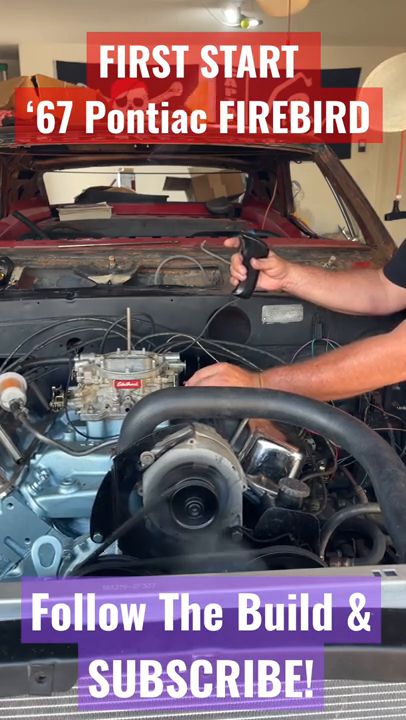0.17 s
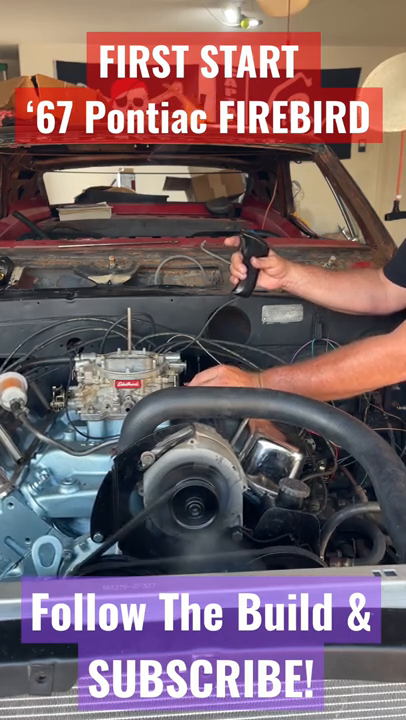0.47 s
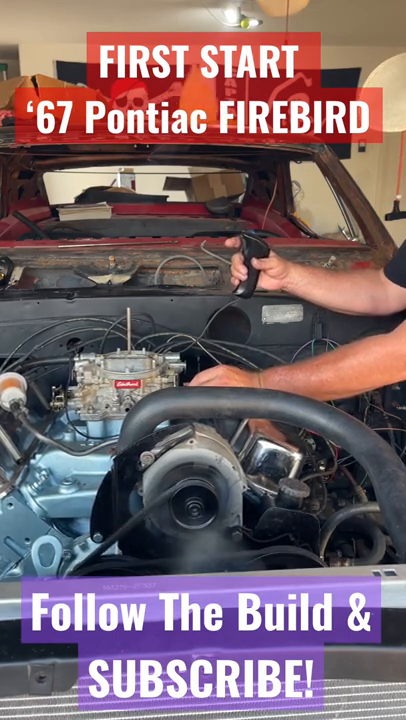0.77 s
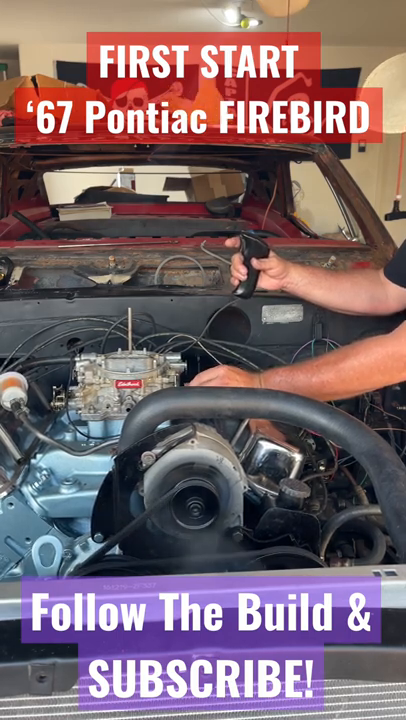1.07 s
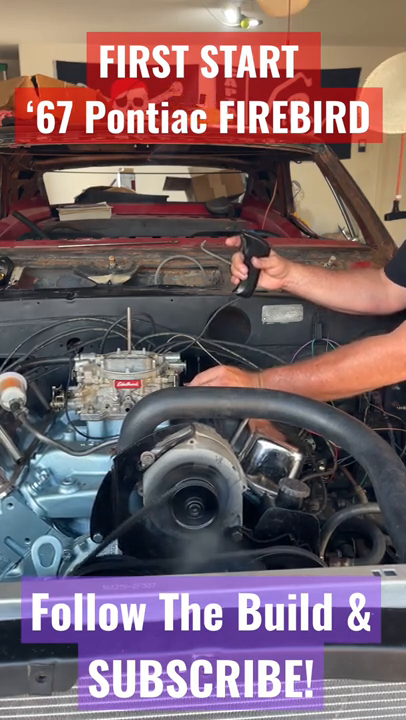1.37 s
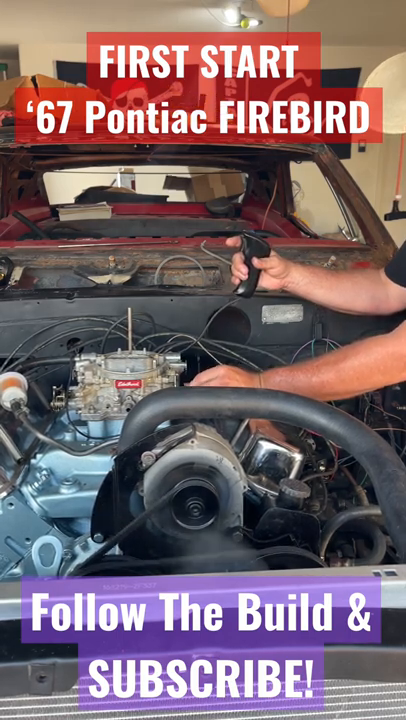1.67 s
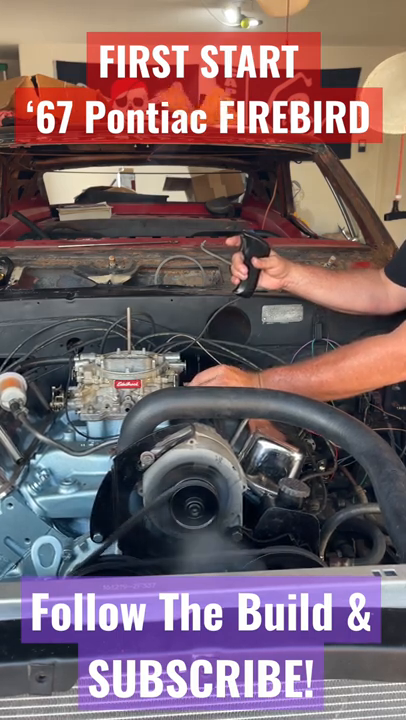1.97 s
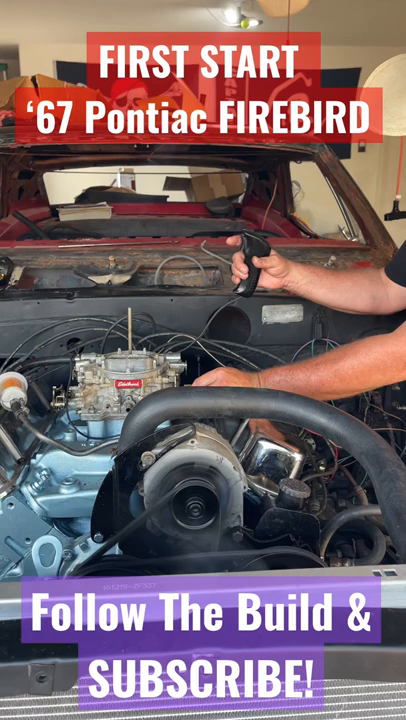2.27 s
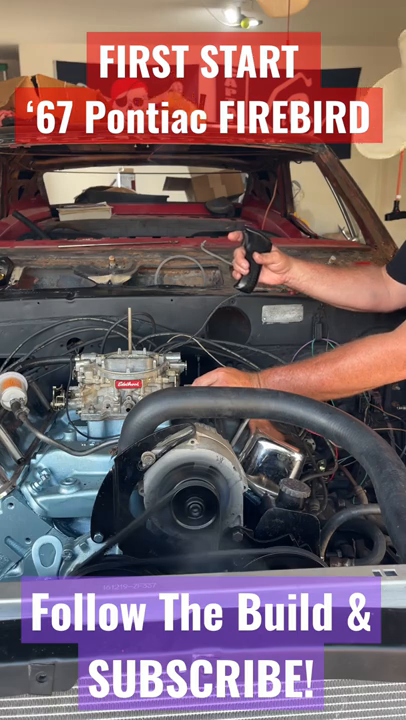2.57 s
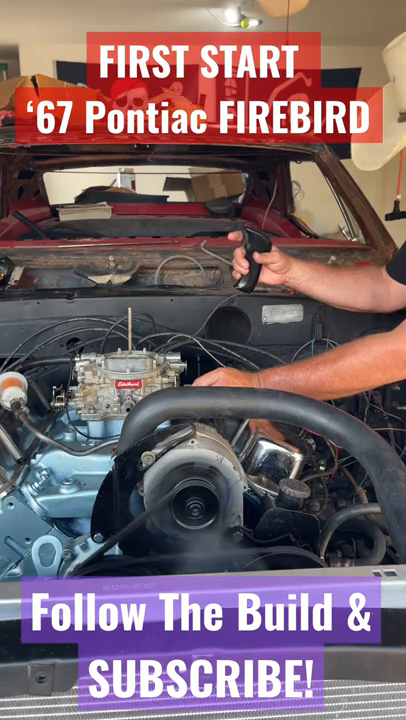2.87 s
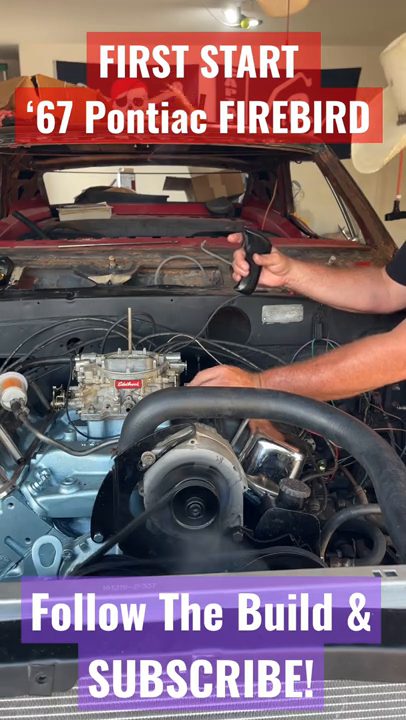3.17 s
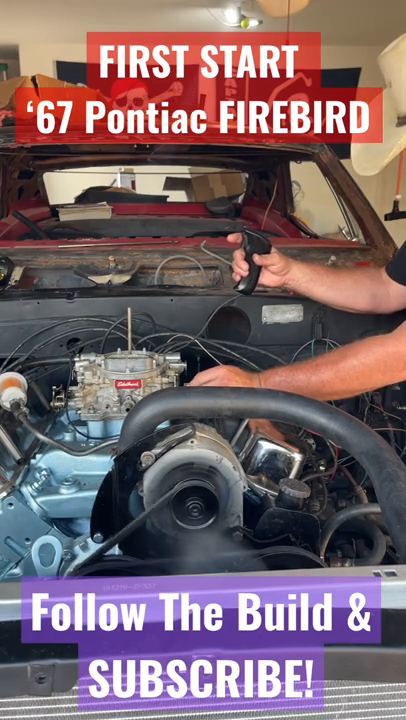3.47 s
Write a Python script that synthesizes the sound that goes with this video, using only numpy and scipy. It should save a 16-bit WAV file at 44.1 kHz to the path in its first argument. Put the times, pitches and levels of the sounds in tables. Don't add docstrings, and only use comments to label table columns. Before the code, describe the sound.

An old eight-cylinder car engine is already running loud and rough, blipped at about 0.3, 0.7, 1.3 and 1.9 seconds, with ringing pipes, air hiss and scattered pops, the strongest near 1.2. From about 2.1 it coasts down, quieter and deeper, over steady fan and belt hiss. Around 3.45-3.6 it stumbles with clustered pops, spitting air and faint belt wheeze. Close phone pickup, hard garage echoes.

```python
import sys
import numpy as np
from scipy import signal
from scipy.fft import rfft, irfft, next_fast_len
from scipy.io import wavfile
from scipy.ndimage import uniform_filter1d

SR = 44100
rng = np.random.default_rng(int(sys.argv[2]) if len(sys.argv) > 2 else 0)


def persist_wave(psi):
    counts = np.round(np.clip(psi, -1, 1) * 32767).astype(np.int16)
    wavfile.write(sys.argv[1], SR, np.atleast_2d(counts).T)


def attenuation_scalar(level_db):
    decades = np.asarray(level_db, float) / 20
    return 10 ** decades


N = 159642
T = np.arange(N) / SR


def evened(x):
    return x / np.sqrt(np.mean(x ** 2) + 1e-20)


def read(points, hz):
    f, value = np.transpose(points)
    return np.interp(np.log(hz + 1), np.log(f + 1), value)


def curve(table, index=1):
    columns = np.transpose(table)
    return np.interp(T, columns[0], columns[index])


def colour(x, points):
    log_gain = np.log(attenuation_scalar(read(points, abs(np.fft.fftfreq(8192, 1 / SR)))))
    taps = np.fft.ifft(np.exp(np.conj(signal.hilbert(log_gain)))).real[:4096]
    return signal.oaconvolve(x, taps)[:len(x)]


def resonate(x, hz, width):
    r = np.exp(-np.pi * width / SR)
    return signal.lfilter([1 - r, 0, r - 1], [1, -2 * r * np.cos(2 * np.pi * hz / SR), r * r], x)


def ringing(x, modes):
    return evened(sum(attenuation_scalar(db) * evened(resonate(x, f, w)) for f, w, db in modes))


def drift(size):
    return evened(uniform_filter1d(uniform_filter1d(rng.standard_normal(N), size), size))


def without(x, gaps):
    size = next_fast_len(N)
    hz = np.fft.rfftfreq(size, 1 / SR)
    keep = np.prod([(hz < lo) | (hz > hi) for lo, hi in gaps], axis=0)
    return irfft(rfft(x, size) * keep, size)[:N]


# t/s, firing rate f/Hz
FIRING_RATE = [(0, 126.4), (.2, 148.9), (.3, 165.3), (.4, 180.5), (.52, 183.2), (.64, 176.5), (.8, 189.3),
               (.92, 184.3), (1.2, 159.5), (1.37, 168.6), (1.5, 166.2), (1.76, 148.6), (1.88, 154.2),
               (2.01, 175.8), (2.12, 173.7), (2.6, 127), (3.0, 96.15), (3.42, 67.45)]


def firing_rate():
    return curve(FIRING_RATE)


# t/s, level/dB
THROTTLE_OPENING = [(0, -23.5), (.17, -26.5), (.31, -19.5), (.45, -24.5), (.6, -28.5), (.69, -21.5),
                    (.77, -24), (.84, -27.5), (1.2, -31.5), (1.3, -25.5), (1.42, -26.5), (1.47, -31.5),
                    (1.74, -32), (1.9, -22.5), (2.04, -27.5), (2.11, -30), (2.9, -39.5), (3.43, -42.5)]


def throttle():
    load_db = curve(THROTTLE_OPENING)
    return load_db, load_db - load_db.max()


# t/s, even firing level/dB, strong-weak lope level/dB, unevenness [0-1]
RUNNING = [(0, -14, -52, 0.37), (.24, -11, -46, 0), (.31, -20.5, -30, 0.82), (.47, -9, -23, 0.41),
           (.54, -18, -14, 0.82), (.68, -20, -30, 0.98), (.79, -17, -24.5, 1), (.91, -23.5, -19, 0.83),
           (1.2, -25, -21.5, 0.87), (1.36, -17, -29, 0.91), (1.46, -30.5, -19.5, 0.69),
           (1.7, -19.5, -23.5, 0.65), (1.88, -13, -33.5, 0.38), (2.07, -19, -22, 1),
           (2.2, -22.5, -22.5, 0.42), (2.48, -19, -27.5, 0.54), (3.12, -26, -32.5, 0.61),
           (3.5, -35.5, -49, .9)]
CYLINDER_STRENGTH = [-1, 1, -1, 4.5, 0, -4.5, -12, 2]


def firings(turns):
    fire = np.arange(1, int(turns[-1]))
    luck = np.clip(rng.standard_normal((len(fire), 3)), -1.7, 1.7)
    uneven = np.interp(fire, turns, np.clip(curve(RUNNING, index=3), 0, 1.5))
    late = 0.1 * uneven * luck[:, 0]
    at = np.interp(fire + late, turns, np.arange(N)).astype(int)
    size_db = np.array(CYLINDER_STRENGTH)[fire % 8] + 3 * luck[:, 1]
    return fire, at, attenuation_scalar(uneven * size_db), luck


# f/Hz, level/dB
EXHAUST_COLOUR = [(30, -30), (55, -1), (75, 7), (140, 2.5), (187, -0.5), (225, -6.5), (330, -3),
                  (1500, -30)]


def exhaust(turns, fire, at, size):
    angle = np.interp(np.arange(N), np.r_[0, at, N], np.r_[0, fire, turns[-1]])
    narrow = 1.63
    hump = np.exp(narrow * (np.cos(2 * np.pi * angle) - 1))
    nearest = np.clip(np.round(angle).astype(int) - 1, 0, len(fire) - 1)
    pulses = attenuation_scalar(curve(RUNNING) + 9.5) * (size[nearest] * hump - hump.mean())
    return colour(pulses, EXHAUST_COLOUR)


# f/Hz, level/dB
LOPE_COLOUR = [(30, -34.5), (55, 0), (85, 3), (150, -5.5), (260, -1), (400, -12), (900, -26), (2500, -53)]


def lope(fire, at, size):
    push = size * SR / (np.sqrt(2) * firing_rate()[at])
    kicks = np.zeros(N)
    kicks[at] = push * attenuation_scalar(curve(RUNNING, index=2)[at]) * (-1.) ** fire
    return colour(kicks, LOPE_COLOUR)


def gas_puffs(turns, size, puff_gain):
    which = np.clip(turns.astype(int) - 1, 0, len(size) - 1)
    fade = np.exp(-(turns % 1) / 0.5)
    gate = 0.8 + puff_gain[which] * np.sqrt(size[which]) * fade
    return gate * rng.standard_normal(N)


# f/Hz, level/dB
ROAR_COLOUR = [(40, -48), (90, -6.5), (190, -2.5), (700, -6), (1500, -18), (2500, -19), (4500, -25),
               (9000, -61)]


def roar(puffs):
    load_db, _ = throttle()
    return attenuation_scalar(load_db + 5) * evened(colour(puffs, ROAR_COLOUR))


# f/Hz, width/Hz, level/dB
PIPE_MODES = [(264, 150, -7), (409, 15, 7.5), (567, 13, -3), (728, 21, -12), (982, 170, 6.5),
              (2300, 200, -63.5)]


def pipes(at, size, puff_gain, puffs):
    _, below_full = throttle()
    clicks = np.zeros(N)
    clicks[at] = np.sqrt(size) * puff_gain
    drive = evened(clicks) + evened(puffs)
    return attenuation_scalar(-25 + 0.78 * below_full) * ringing(drive, PIPE_MODES)


# multiple of firing rate, level/dB
LOAD_TONES = [(1.625, -22.5), (2.0, -27), (2.25, -25)]


def load_tones(turns):
    _, below_full = throttle()
    tones = np.zeros(N)
    for multiple, db in LOAD_TONES:
        level = attenuation_scalar(db + 2.5 * drift(size=1500))
        tones += level * np.sqrt(2) * np.sin(2 * np.pi * multiple * turns)
    return attenuation_scalar(1.66 * below_full) * tones


# f/Hz, width/Hz, level/dB
BOOM_MODES = [(102, 26, 0), (137.3, 17, 0.5), (399, 24, -10.5)]


def boom():
    _, below_full = throttle()
    rough = np.clip(curve(RUNNING, index=3), 0, 1.5)
    stir = rng.standard_normal(N)
    air = evened(sum(attenuation_scalar(db) * evened(resonate(resonate(stir, f, w), f, w)) for f, w, db in BOOM_MODES))
    return rough ** 2 * attenuation_scalar(-19 + 0.14 * below_full) * air


def engine():
    turns = np.cumsum(firing_rate()) / SR
    fire, at, size, luck = firings(turns)
    puff_gain = attenuation_scalar(2.4 * luck[:, 2])
    puffs = gas_puffs(turns, size, puff_gain)
    thump = exhaust(turns, fire, at, size) + lope(fire, at, size)
    rough_air = roar(puffs) + boom()
    return thump + rough_air + pipes(at, size, puff_gain, puffs) + load_tones(turns)


# f/Hz, level/dB
POP_COLOUR = [(80, -17), (300, 6), (900, -6.5), (2000, -11.5), (4000, -8.5), (8000, -22.5)]
# f/Hz, level/dB
HISS_COLOUR = [(1500, -37.5), (4000, -7), (6000, -5), (9000, -5), (11000, -1), (12500, -10.5), (14000, -27),
               (15500, -20)]
# t/s, level/dB, ring f/Hz, puff length/s, hiss level/dB
STRAY_BURNS = [(.296, -23, 910, 0.016, -34), (.564, -15, 1090, 0.0082, -38), (.682, -16.5, 2300, .01, -40),
               (.828, -23, 2270, 0.0066, -47), (1.16, -10.5, 600, 0.0094, -34),
               (2.03, -17.5, 2200, .006, -42), (2.402, -21.5, 800, .015, -43),
               (3.453, -22.5, 401.5, 0.029, -31), (3.456, -28, 1654, 0.0081, -50),
               (3.457, -33, 690, 0.0058, -50), (3.484, -30, 2090, 0.017, -42), (3.606, -23, 750, .01, -50),
               (3.546, -22, 1550, 0.031, -23), (3.579, -22, 650, 0.039, -28.5),
               (3.604, -19.5, 3060, 0.0083, -30), (3.605, -24, 2100, 0.018, -37)]


def pops():
    out = np.zeros(N + 8192)
    t = np.arange(8192) / SR
    for s, db, hz, puff_s, hiss_db in STRAY_BURNS:
        rise = np.minimum(t / 0.0025, 1)
        puff = rng.standard_normal(8192) * rise * np.exp(-t / puff_s)
        strength = np.sqrt(np.mean(puff ** 2))
        ring_share = min(0.0082 / puff_s, 0.9)
        ring = evened(resonate(puff, hz, width=140))
        thud = evened(colour(puff, POP_COLOUR))
        body = ring_share * ring + (1 - ring_share) * thud
        spit = attenuation_scalar(hiss_db) * evened(colour(puff, HISS_COLOUR))
        out[round(s * SR):][:8192] += strength * (attenuation_scalar(db) * body + spit)
    return out[:N]


def intake():
    _, below_full = throttle()
    carburettor, fan = attenuation_scalar(-22 + 1.086 * below_full), attenuation_scalar(-38)
    air = evened(colour(rng.standard_normal(N), HISS_COLOUR))
    flutter = attenuation_scalar(0.83 * (drift(size=200) + drift(size=900)))
    return np.hypot(carburettor, fan) * flutter * air


# f/Hz, level/dB
HIGH_HISS_COLOUR = [(6000, -41), (9500, 5), (12000, 4), (14000, -13.5), (16000, -4)]


def late_high_hiss():
    stall = np.clip((97 - firing_rate()) / 18.9, 0, 1)
    return attenuation_scalar(-36.5) * stall * evened(colour(rng.standard_normal(N), HIGH_HISS_COLOUR))


def garage(x):
    taps = np.zeros((2, 22000))
    at = np.arange(200, 21900, 20) + rng.integers(0, 20, (2, 1085))
    np.put_along_axis(taps, at, rng.choice([-1., 1.], at.shape), 1)
    taps *= attenuation_scalar(-60 * np.arange(22000) / SR / 0.59)
    taps /= np.linalg.norm(taps[0])
    taps = signal.lfilter(*signal.butter(2, 302, "high", fs=SR), taps)
    return signal.fftconvolve(x[None], taps, axes=1)[:, :N]


# f/Hz, likeness [0-1]
PORT_LIKENESS = [(100, 0.98), (400, .96), (1000, 0.83), (1800, 1), (3500, 0.65), (6000, 0.93), (9000, 1),
                 (12000, 0.92)]
# f/Hz, phase [half turns, applied to each port in opposite directions]
PORT_LEAD = [(1950, 0), (2800, .13), (4150, .16), (4550, .28), (5250, .8), (5800, 1.0), (9000, 1.5),
             (12100, 2.0)]
# f/Hz, level/dB
PORT_TILT = [(60, 0), (200, -.5), (700, -1.5), (2300, -.6), (4300, -.6), (7000, 0)]


def phone_ports(direct, other):
    size = next_fast_len(N)
    hz = np.fft.rfftfreq(size, 1 / SR)
    same = np.clip(read(PORT_LIKENESS, hz), 0, 1)
    common = np.sqrt((1 + same) / 2) * rfft(direct, size)
    apart = np.sqrt((1 - same) / 2) * rfft(other, size)
    lead = np.exp(1j * np.pi * np.interp(hz, *np.transpose(PORT_LEAD)))
    port = lead * attenuation_scalar(read(PORT_TILT, hz) / 2)
    return irfft(np.array([(common + apart) * port, (common - apart) / port]), size)[:, :N]


def scene():
    dry = engine() + pops() + intake() + late_high_hiss()
    wet, other = garage(dry)
    return phone_ports(dry + attenuation_scalar(-7.5) * wet, other)


def roll_off(x):
    return signal.sosfilt(signal.butter(12, 15100, fs=SR, output="sos"), x)


def record(dry):
    mix = np.tanh(dry)
    return roll_off(mix)


dry = scene()
out = record(dry)
persist_wave(out)
```